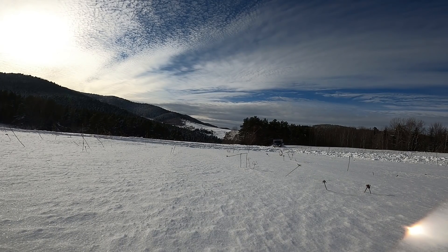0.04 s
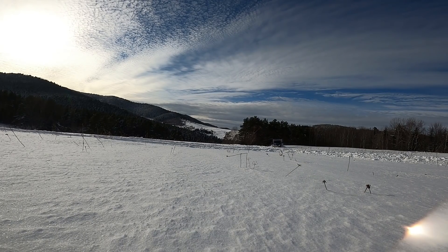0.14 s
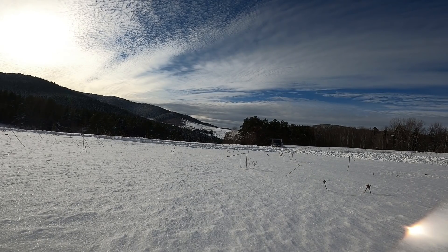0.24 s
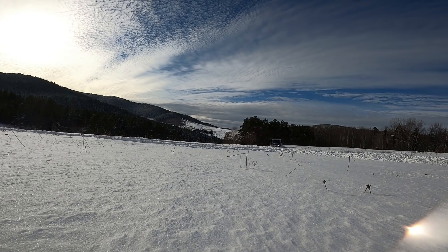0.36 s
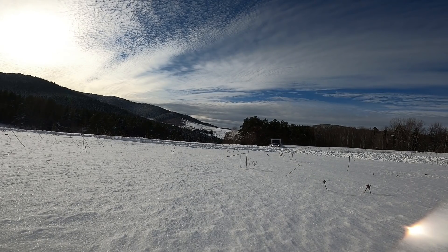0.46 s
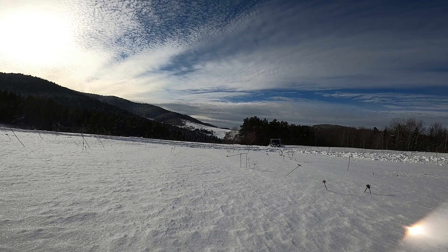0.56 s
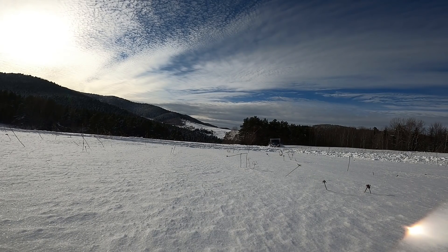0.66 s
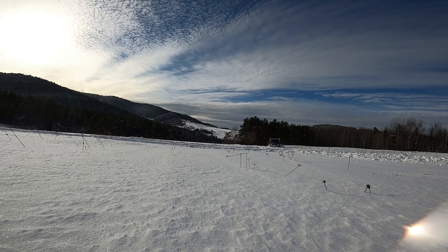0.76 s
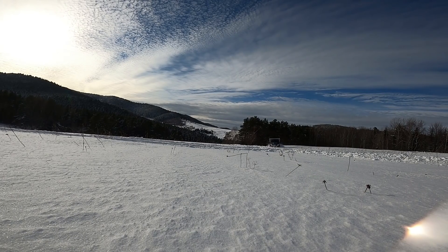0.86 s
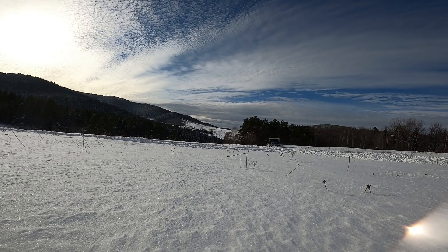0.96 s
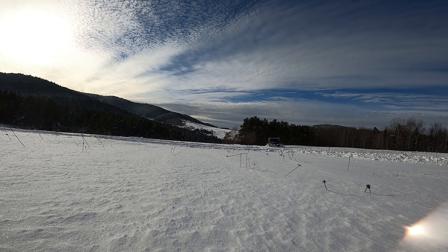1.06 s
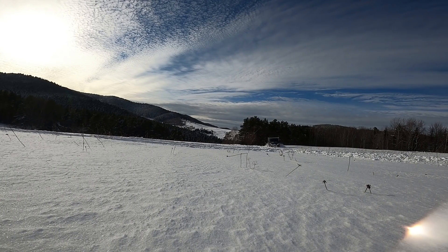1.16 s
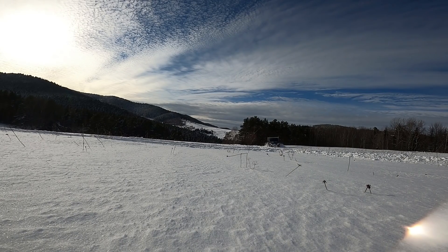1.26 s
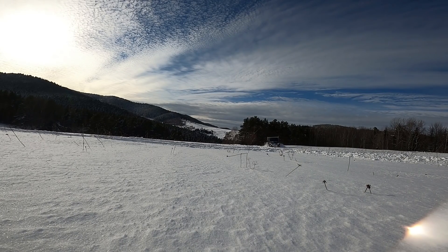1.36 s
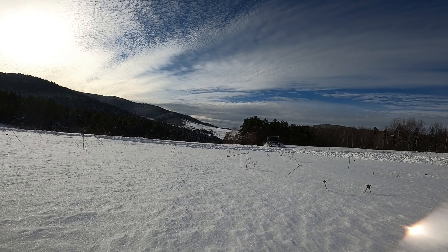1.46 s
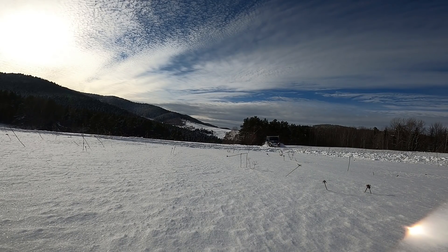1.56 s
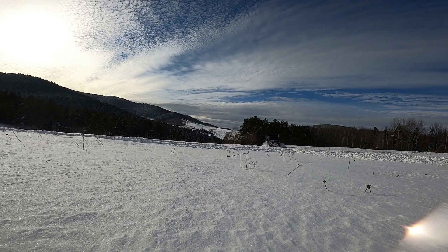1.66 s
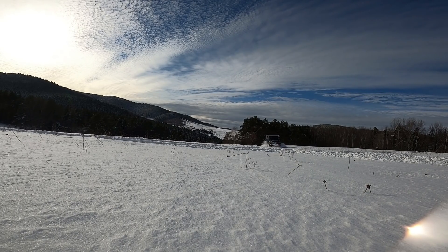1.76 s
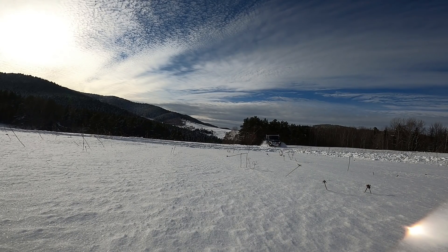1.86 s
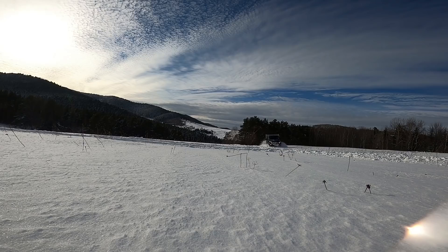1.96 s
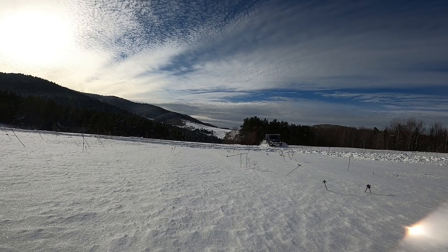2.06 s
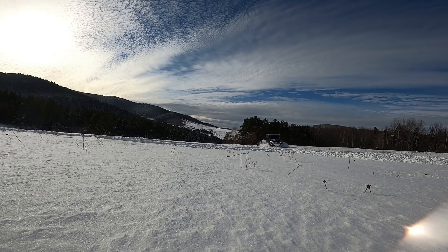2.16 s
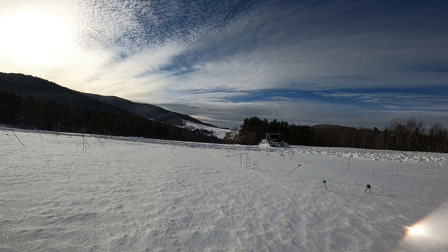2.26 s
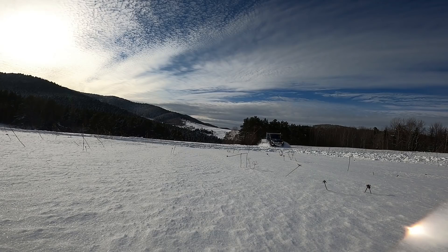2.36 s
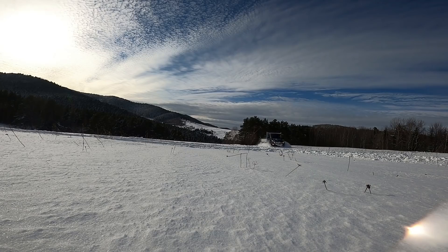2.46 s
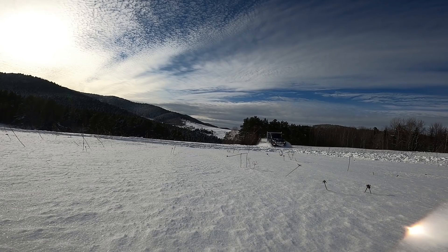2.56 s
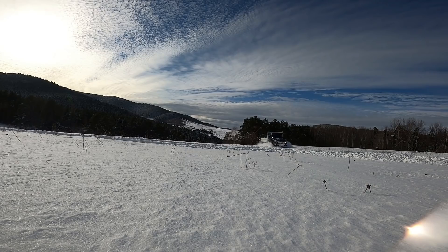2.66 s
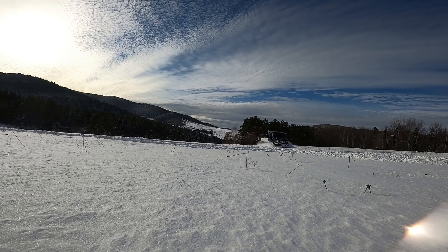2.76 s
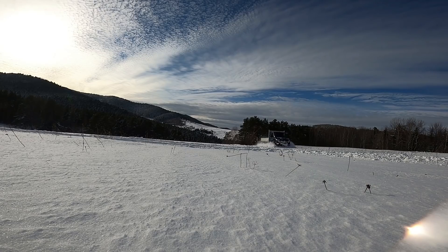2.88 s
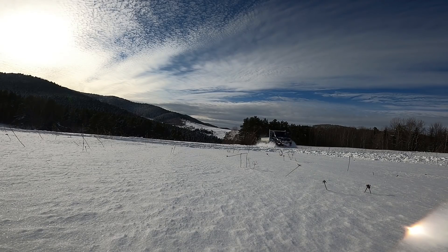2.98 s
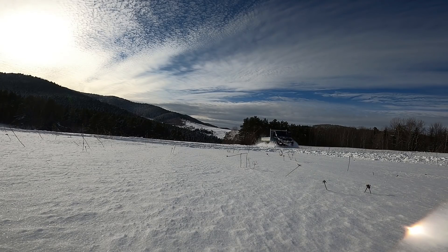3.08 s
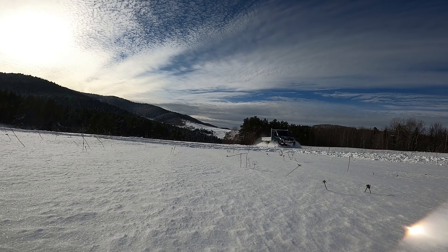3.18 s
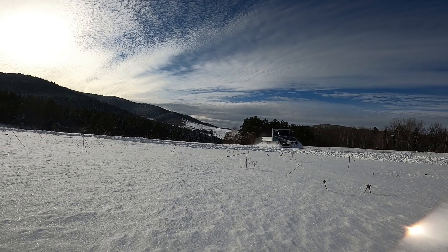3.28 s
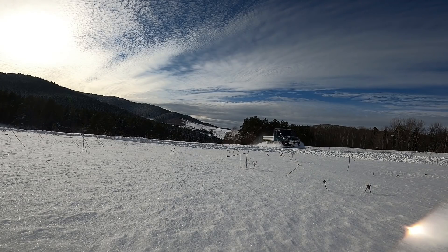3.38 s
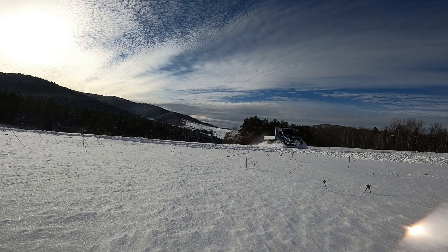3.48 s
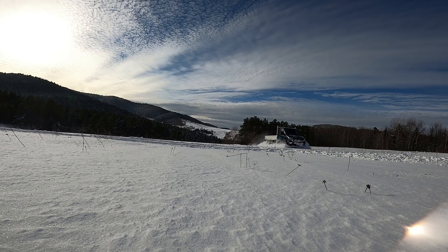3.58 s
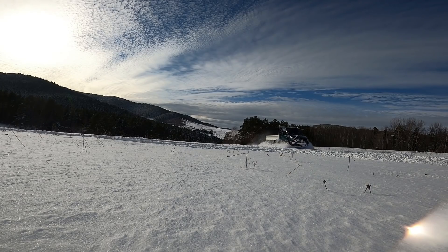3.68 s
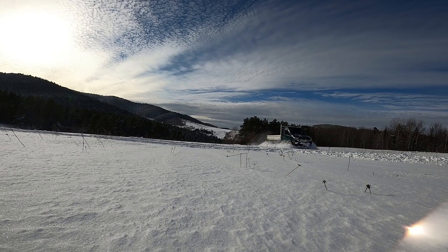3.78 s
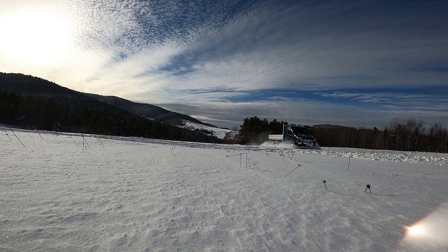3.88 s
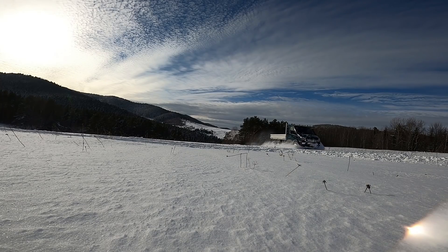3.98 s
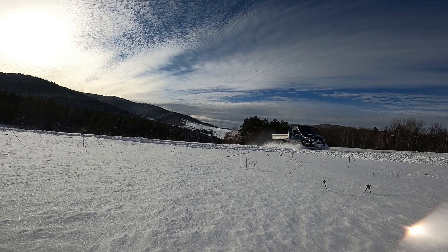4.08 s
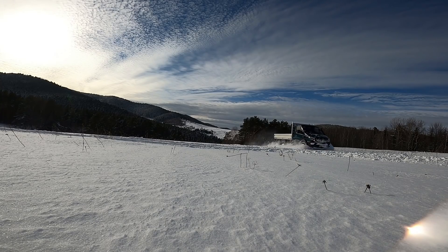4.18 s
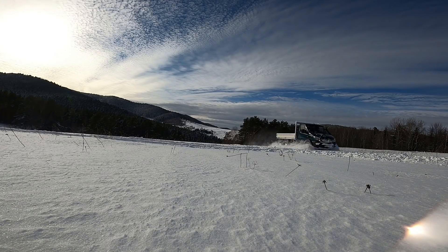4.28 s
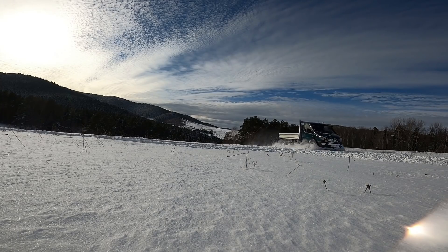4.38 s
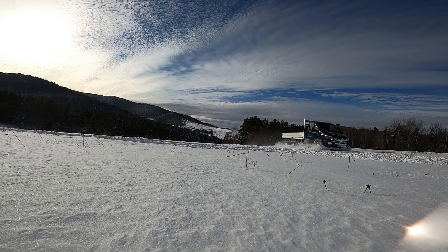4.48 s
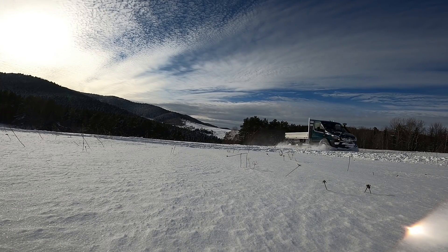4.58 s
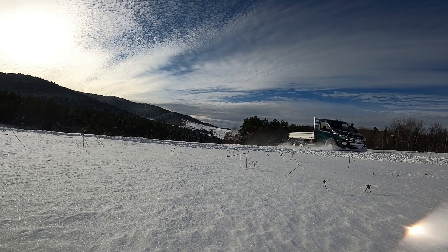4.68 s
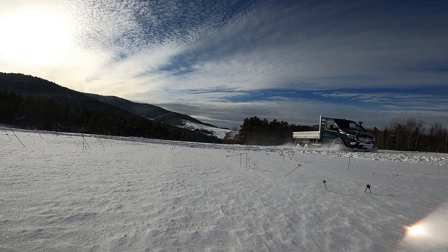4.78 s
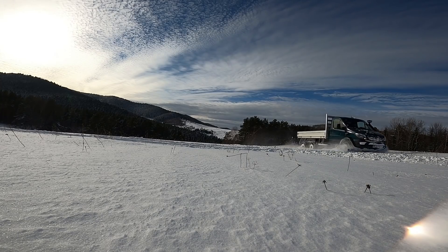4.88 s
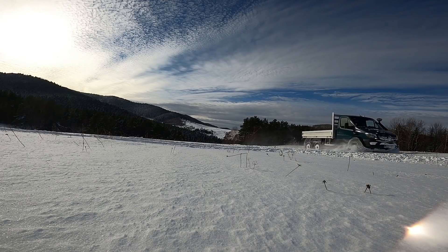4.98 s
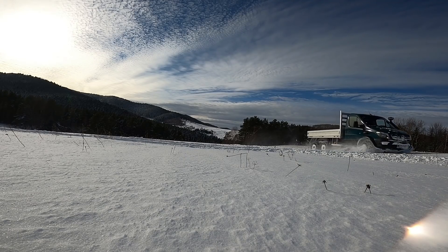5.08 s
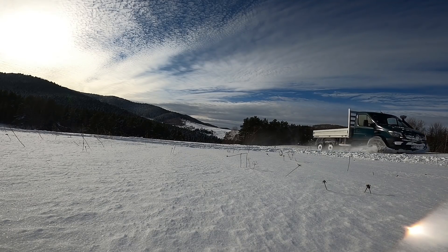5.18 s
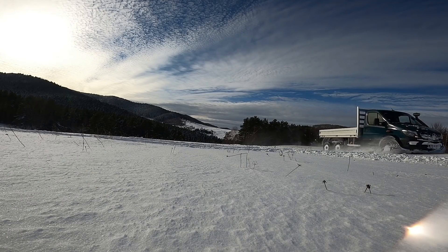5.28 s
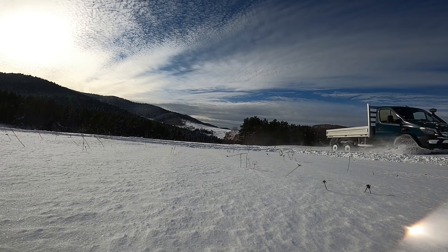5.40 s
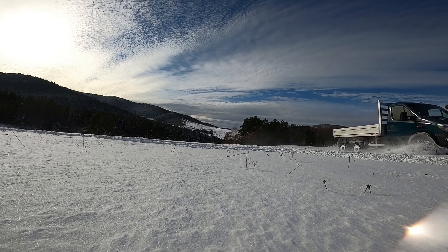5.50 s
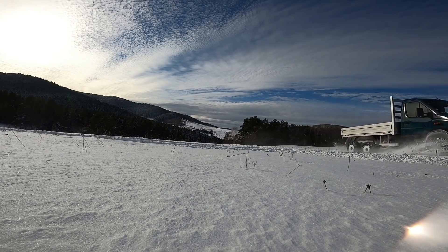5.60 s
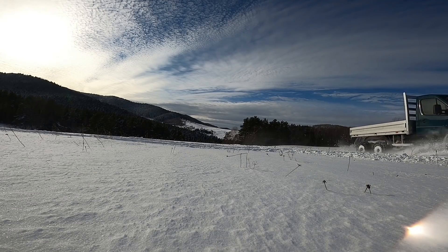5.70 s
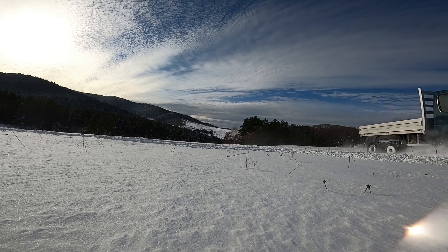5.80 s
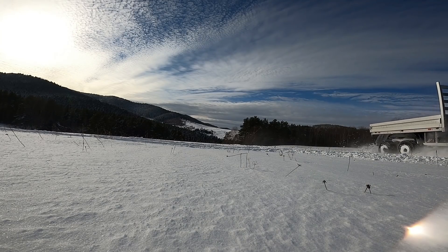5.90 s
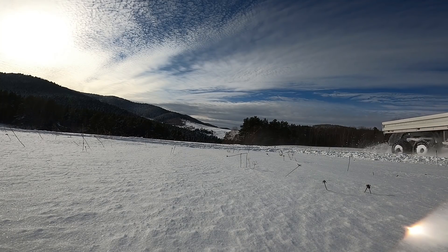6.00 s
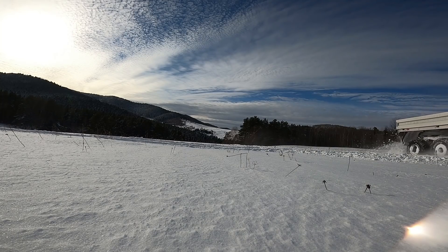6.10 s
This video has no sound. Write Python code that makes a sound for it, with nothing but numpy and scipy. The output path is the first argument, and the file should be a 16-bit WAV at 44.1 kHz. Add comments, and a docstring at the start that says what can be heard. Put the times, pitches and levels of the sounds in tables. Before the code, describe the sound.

Open snowy field, no echo, small stereo camera microphone. From 0 s a distant van hums low and roughly, surging as it digs in, with a hissing rush of air through the grille and two faint ticks at the start. Wind rumbles on the microphone with soft, irregular low thumps throughout. The engine slows in uneven dips, especially around 2.3 and 2.9-3.2 s; just after 3.2 s it emerges less muffled, with a fuller mid-range drone. Tyre churn grows steadily. From about 4 s a thin, unsteady whistle flickers near 1.9 kHz. Around 5 s coarse snow spray becomes prominent, and between 5.2 and 5.8 s loud brittle snaps and short crackles burst out, with a dull thud near 5.3 s. The air rush becomes shadowed as the van draws level on the right around 6.1 s, with another snap and thud, wind strongest, the engine still labouring at the cutoff.

```python
"""A van labours through deep snow across an open field and draws level on the right, its engine sagging under load.
The exhaust hums on crank orders, firings ring the engine bay, and noise rushes through the grille.
Noise and grains make the churned snow; short pulses and bursts make brittle snaps, crackles and dull thuds.
A thin sliding whistle comes and goes. Shaped noise makes wind on the two ports of a small camera,
with short low thumps of a decaying sine."""
import sys
import numpy as np
from scipy import signal
from scipy.fft import rfft, irfft, next_fast_len
from scipy.io import wavfile
from scipy.ndimage import uniform_filter1d, map_coordinates

SR = 44100
rng = np.random.default_rng(int(sys.argv[2]) if len(sys.argv) > 2 else 0)


def store_pcm(level_fs):
    """Save levels as 16-bit WAV."""
    pcm = np.round(np.clip(level_fs, -1, 1) * 32767).astype(np.int16)
    wavfile.write(sys.argv[1], SR, np.atleast_2d(pcm).T)


N = 271082
T = np.arange(N) / SR  # seconds


def amp(db):
    """Decibels to gain."""
    return 10 ** (np.asarray(db) / 20)


def unit(x):
    """Scale to rms 1, all rows together."""
    return x / np.sqrt(np.mean(x ** 2) + 1e-20)


def along(points, hz):
    """(Hz, value) points read on a log axis."""
    f, v = np.transpose(points)
    return np.interp(np.log(hz + 1), np.log(f + 1), v)


def curves(rows):
    """One value per sample for each column after the time."""
    s, *cols = np.transpose(rows)
    return [np.interp(T, s, c) for c in cols]


def wobble(rate_hz):
    """A smooth random curve through rate_hz knots a second."""
    knots = rng.standard_normal(int(N * rate_hz / SR) + 4)
    return map_coordinates(knots, [T * rate_hz])


def gate(start_s, length_s, edge_s):
    """Rise, hold and fall between 0 and 1."""
    inside_s = np.minimum(T - start_s, start_s + length_s - T)
    return np.clip(.5 + inside_s / edge_s, 0, 1)


def turned(at_s, over_s):
    """A smooth step from 0 to 1."""
    return .5 + .5 * np.tanh((T - at_s) / over_s)


def filtered(x, response):
    """x times a complex response of frequency."""
    m = next_fast_len(N + SR // 2)
    return irfft(rfft(x, m) * response(np.fft.rfftfreq(m, 1 / SR)), m)[..., :N]


def coloured(x, spectrum):
    """x shaped by (Hz, dB) points, at rms 1."""
    return unit(filtered(x, lambda hz: amp(along(spectrum, hz))))


def resonate(x, modes):
    """x rung through (Hz, width, dB) resonances with hollows between them, at rms 1."""
    def body(f):
        return sum(amp(db) * 1j * f * w / (c * c - f * f + 1j * f * w) for c, w, db in modes)
    return unit(filtered(x, body))


def steadied(x, over_s):
    """x with its slow swells evened out, at rms 1."""
    size = max(int(over_s * SR), 1)
    power = uniform_filter1d(uniform_filter1d(x ** 2, size=size), size=size)
    return unit(x / np.sqrt(np.abs(power) + 1e-6))


def noise(patchy_db):
    """Two rows of noise (direct, diffuse) sharing patches of gain in time and frequency."""
    z = signal.stft(rng.standard_normal((2, N)), nperseg=1024)[2]
    field = uniform_filter1d(rng.standard_normal(z.shape[1:]), size=6, axis=0)
    field = uniform_filter1d(field, size=12, axis=1)
    patched = signal.istft(z * amp(patchy_db * unit(field)), nperseg=1024)[1]
    return unit(patched[:, :N])


def grains(rate_hz, spread_db):
    """Two rows of tiny random impulses of uneven size, at rms 1."""
    hits = rng.random((2, N)) < rate_hz / SR
    sizes = rng.standard_normal((2, N)) * amp(spread_db * rng.standard_normal((2, N)))
    return unit(hits * sizes)


# the van's straight path
SPEED_M_PER_S, CLOSEST_M, LEVEL_AT_S = 7.09, 8.28, 6.108


def distance():
    """Metres from the van to the camera."""
    return np.hypot(CLOSEST_M, SPEED_M_PER_S * (T - LEVEL_AT_S))


def carried(close_db, doubling_db, per_m_db):
    """Gain over distance: spreading loss per doubling, and a little soaked up by the snow per metre."""
    r = distance()
    return amp(close_db - doubling_db * np.log2(r / CLOSEST_M) - per_m_db * (r - CLOSEST_M))


def screened(loss_db):
    """The engine is muffled until the van comes clear of a rise in the snow."""
    return amp(loss_db * (1 - turned(at_s=3.24, over_s=0.038)))


# Engine speed before waver. Each row: time in seconds, crankshaft speed in turns per second.
CRANK_TURNS_PER_S = [(0.0, 70.0), (1.2, 68.7), (2.13, 68.2), (2.33, 65.2), (2.45, 66.3), (2.6, 65.2),
                     (2.75, 64.6), (2.85, 61.5), (3.0, 64.0), (3.12, 64.4), (3.21, 58.8), (3.6, 57.6),
                     (3.97, 57.5), (4.15, 54.9), (4.33, 57.5), (4.5, 52.7), (4.68, 52.7), (4.84, 55.0),
                     (5.02, 52.0), (5.15, 52.0), (5.28, 55.0), (5.53, 55.0), (5.59, 53.2), (5.64, 55.3),
                     (5.75, 55.9), (5.81, 57.4), (5.89, 57.2), (5.98, 54.8), (6.15, 57.8)]


def crank_turns(waver=0.0043):
    """Turns of the crankshaft so far; the speed wavers as the wheels grip and slip."""
    return np.cumsum(curves(CRANK_TURNS_PER_S)[0] * (1 + waver * wobble(22))) / SR


def firing_gate(turns, depth):
    """Four cylinders give two surges of flow a turn."""
    return unit(1 + np.clip(depth, 0, 1) * np.cos(2 * np.pi * 2 * turns))


# Exhaust note. Each row: order in multiples of crank speed, relative level in dB.
NOTE_ORDER_DB = [(3, -12), (4, 14.5), (4.5, -1), (5, -16), (5.5, -13)]
# Spectrum of gas from the pipe. Each row: frequency in Hz, relative density in dB.
PIPE_HZ_DB = [(25, -17), (55, 3), (85, 5), (118, -3.5), (160, -9), (190, -26.5), (300, -21.5), (600, -82),
              (2000, -120)]
# Swells as the engine digs in. Each row: start in seconds, length in seconds, boost in dB.
SURGES_S_DB = [(0.0, 0.089, 14.5), (0.14, 0.3, 18), (0.91, 0.27, 5), (1.43, 0.091, 8.5), (1.74, 0.16, 8.5),
               (2.078, 0.3, 7), (2.43, 0.34, 7.5), (2.794, 0.33, 5), (3.576, .44, 1.5), (4.046, 0.22, 8),
               (4.392, 0.57, 5), (5.292, 0.36, 2)]


def exhaust(turns):
    """Crank orders, roughened by uneven combustion and wrapped in rasp, over a throb of gas from the pipe."""
    rough_rad, flutter_db, shimmer_db = .27, 1.5, 1.7
    far_rasp_db, near_rasp_db = -5, -16.5

    def order(k):
        phase = 2 * np.pi * (k * turns + rng.random()) + rough_rad * wobble(60)
        return np.sin(phase) * amp(flutter_db * wobble(30))

    note = unit(sum(amp(db) * order(k) for k, db in NOTE_ORDER_DB))
    rasp_hz_db = [(110, -36), (150, -8), (195, -14.5), (245, -3.5), (272, 1.0), (305, -10), (420, -29), (800, -92)]
    rasp = coloured(noise(patchy_db=2.0), rasp_hz_db)
    gas = coloured(noise(patchy_db=1.0) * firing_gate(turns, depth=0.47), PIPE_HZ_DB)
    # while the van is far off, moving air shakes the hum and the rasp stands out more
    far = np.interp(T, [3.6, 4.1], [1, 0])
    shaken = note * amp(shimmer_db * far * wobble(29.99))
    voice = shaken + amp(far * far_rasp_db + (1 - far) * near_rasp_db) * rasp
    surge_db = sum(db * gate(s, length, edge_s=0.015) for s, length, db in SURGES_S_DB)
    hum = carried(close_db=-37.0, doubling_db=10.5, per_m_db=0.43) * amp(surge_db) * voice
    # a faint extra rasp as the engine first bogs down
    bogging = amp(-59) * gate(3.05, 0.86, edge_s=.08) * rasp
    throb = carried(close_db=-31, doubling_db=6, per_m_db=0.6) * gas
    firing_tone = unit(order(2) * amp(3.6 * wobble(14)))
    firing = carried(close_db=-41, doubling_db=0.5, per_m_db=0.5) * screened(loss_db=-6.5) * firing_tone
    return hum + bogging + throb + firing


# Engine bay resonances. Each row: centre in Hz, width in Hz, relative level in dB.
BAY_HZ_HZ_DB = [(275, 25, -8), (459, 16, -12), (574, 43, 7), (634, 37, -3.5), (705, 18, -3.5),
                (846.4, 17.5, 1), (971, 18, -5.5)]
# Drone swells and slackens with load. Each row: start in seconds, length in seconds, change in dB.
LOADS_S_DB = [(3.09, .08, -1), (3.19, 0.089, 3.5), (3.387, 0.091, 1.5), (4.633, 0.15, 0.5),
              (4.86, 0.272, -2), (5.252, 0.11, 1.5), (5.771, 0.33, 1.5)]


def engine_bay(turns, knock=0.42, uneven=0.41):
    """Each firing knocks the resonances of the engine bay, joined by noise, into a continuous drone."""
    at = np.flatnonzero(np.diff(np.floor(2 * turns)))
    cylinders = np.resize(rng.standard_normal(size=4), len(at))
    knocks = np.zeros(N)
    knocks[at] = 1 + uneven * (cylinders + rng.standard_normal(len(at)))
    drive = knock * unit(knocks) + noise(patchy_db=1.5) * firing_gate(turns, depth=0.11)
    drone = steadied(resonate(drive, BAY_HZ_HZ_DB), over_s=.09)
    load_db = sum(db * gate(s, length, edge_s=0.04) for s, length, db in LOADS_S_DB)
    gain = carried(close_db=-40.5, doubling_db=4.0, per_m_db=0.66) * screened(loss_db=-2.5)
    return gain * amp(load_db) * drone


# Air rush spectrum. Each row: frequency in Hz, relative density in dB.
RUSH_HZ_DB = [(600, -89), (1100, -11), (1800, -4), (2300, -5.5), (2800, -0.5), (3400, 0.5), (4000, -1),
              (4800, 2), (6000, -1.5), (6900, -5), (7750, -9.5), (8150, -18.5), (12300, -30), (15000, -44)]
# Narrow resonances of air through grille and fan. Each row: centre in Hz, width in Hz,
# level in dB relative to the rush, strongest moment in seconds, spread in seconds, slide in Hz per second.
GRILLE_RINGS = [(1312, 100, -14.5, 2.75, 0.65, -100), (2025, 110, -17, 1.6, 0.49, -31.5),
                (1716, 130, -13.5, 3.75, 0.43, -39.5), (2712, 120, -14, 0.3, 2.4, 1),
                (3230, 120, -15.5, 0.47, 1.6, -2), (3630, 150, -17, .5, 1.8, 0),
                (4650, 300, -8, 0.44, 1.45, 21), (4900, 170, -16, 2.4, 0.46, -1),
                (3260, 280, -13.5, 3.6, 0.62, -40.5), (3750, 150, -12.5, 4.4, 0.86, -57),
                (4710, 160, -10.5, 4.4, 0.92, -100), (6090, 430, -15.5, 0.27, 2, 2)]


def fan(turns):
    """Air rushes through the grille; its narrow noise resonances swell, slide and fade."""
    air = coloured(noise(patchy_db=1.58) * firing_gate(turns, depth=0.024), RUSH_HZ_DB)
    rings = 0
    for hz, width_hz, db, at_s, spread_s, slide_hz_per_s in GRILLE_RINGS:
        lowpass = lambda f: 1 / (1 + (2 * f / width_hz) ** 4)
        band = unit(filtered(rng.standard_normal((2, N)), lowpass))
        phase = 2 * np.pi * np.cumsum(hz + slide_hz_per_s * (T - at_s)) / SR
        swell = amp(db) * np.exp(-((T - at_s) / spread_s) ** 2 / 2)
        rings = rings + swell * (band[0] * np.cos(phase) + band[1] * np.sin(phase))
    # in passing, the cab shadows the whole rush
    shadow = amp(-11 * turned(at_s=5.65, over_s=0.86))
    surge = amp(0.43 * wobble(14))
    direct_only = np.array([[1], [0]])
    gain = carried(close_db=-34.5, doubling_db=5, per_m_db=0.3) * shadow * surge
    return gain * (air + rings * direct_only)


# Tyre churn spectrum. Each row: frequency in Hz, relative density in dB.
CHURN_HZ_DB = [(100, -23), (300, -7), (420, -15), (620, 0.5), (715, -2), (790, -8), (940, -11),
               (1060, -0.5), (1280, 5), (1520, 2.5), (1800, 4.5), (2250, -2.5), (3300, -13), (5000, -26),
               (9000, -50), (15000, -66)]
# Thrown snow spectrum. Each row: frequency in Hz, relative density in dB.
SPRAY_HZ_DB = [(150, 14), (400, -0.5), (690, 6.5), (780, -2), (900, 2), (1150, 3), (1500, 1), (2200, 2.5),
               (3500, -3), (4300, -12), (5000, -11), (7500, -12), (8700, -39), (12500, -44), (14200, -55),
               (15500, -65)]


def wheels(grainy=0.69, surge_db=0.5):
    """Tyres churn the snow; once the van's flank shows, the thrown crumbs stand out."""
    def crumbs():
        return grainy * grains(rate_hz=2500, spread_db=2.5)

    churn = coloured(noise(patchy_db=0.3) + crumbs(), CHURN_HZ_DB)
    churn = carried(close_db=-43.0, doubling_db=2.0, per_m_db=0.6) * churn
    spray = coloured(noise(patchy_db=1) + crumbs(), SPRAY_HZ_DB)
    spray = carried(close_db=-34.0, doubling_db=17.0, per_m_db=3.0) * spray
    hidden_db = -9 * (1 - turned(at_s=4.96, over_s=0.074))
    # far off, the lie of the snow screens the tyres
    screened_db = -3.5 * (1 - turned(at_s=2.03, over_s=0.14))
    return (amp(screened_db) * churn + amp(hidden_db) * spray) * amp(surge_db * wobble(15))


# Freshening wind, before trims. Each row: time in seconds, buffet level in dB.
WIND_S_DB = [(0, -42), (.9, -45.5), (1.35, -44), (1.6, -41.5), (1.95, -40), (3.3, -39), (3.9, -35.5),
             (4.6, -37.5), (5.2, -33.5), (6.15, -30)]
# Wind pressure spectrum. Each row: frequency in Hz, relative density in dB.
BUFFET_HZ_DB = [(8, -15.5), (22, -1.5), (37, 1.5), (48, -1.5), (62, -4.5), (85, -10.5), (120, -25.5),
                (200, -25.5), (400, -39.5), (1000, -77), (4000, -120)]


def wind(trim_db=-0.1, lump_db=0.05, eddy_db=-23, eddy_lump_db=4, left_db=1.65):
    """Wind presses on both ports, with low thumps; small eddies flick each port alone."""
    press = steadied(coloured(rng.standard_normal(N), BUFFET_HZ_DB), over_s=.1)
    press = unit(press * amp(lump_db * wobble(23)))
    eddy_hz_db = [(15, -12), (50, -4.0), (150, -6.5), (400, -12.0), (1500, -31), (4000, -120)]
    eddies = coloured(rng.standard_normal((2, N)), eddy_hz_db)
    eddies = unit(eddies * amp(eddy_lump_db * np.array([wobble(26), wobble(23.2)])))
    buffet = amp(curves(WIND_S_DB)[0] + trim_db) * (press + amp(eddy_db) * eddies)
    return (buffet + thumps()) * amp([[left_db], [-left_db]])


# Brittle snaps and crackles: two faint early ticks, then loud cracks close by. Each row: time in seconds,
# crack level in dB, knock as a share of the crack, crackle level in dB, crackle length in seconds.
SNAPS_S_DB = [(0.04, -40, .3, -50.5, 0.0035), (.135, -46, .3, -56.5, 0.015),
              (5.1823, -10.5, 0.34, -30, 0.01), (5.274, -13, 0.23, -36, 0.011),
              (5.284, -24, .4, -33.5, 0.014), (5.3178, -10.5, 0.6, -29.5, 0.0057),
              (5.4396, -14, 0.35, -31.5, 0.0072), (5.6384, -8.5, .28, -29.5, 0.0049),
              (5.759, -16, 0.46, -38, 0.0048), (6.106, -22, .3, -32, 0.012)]


def snaps(crack_hz=4000, crack_life_s=0.00031, knock_hz=1900, knock_life_s=.00024):
    """Each brittle snap is a crack of a few cycles over a duller knock."""
    out = np.zeros(N)
    for s, db, knock_share, _, _ in SNAPS_S_DB:
        t = T - s
        crack = np.exp(-(t / crack_life_s) ** 2) * np.cos(2 * np.pi * crack_hz * t)
        knock = np.exp(-(t / knock_life_s) ** 2) * np.sin(2 * np.pi * knock_hz * t)
        out += amp(db) * (crack - knock_share * knock)
    return out


def crackles(lag_share=0.53):
    """Short bursts of coloured grains that peak just after each snap."""
    bursts = 0
    for s, _, _, db, length_s in SNAPS_S_DB:
        bursts = bursts + amp(db) * np.exp(-(2 * ((T - s) / length_s - lag_share)) ** 2)
    crackle_hz_db = [(200, -16), (800, -9), (1400, -1), (2500, 0), (4300, 0),
                     (5600, -13), (7000, -16), (9000, -37), (15000, -54)]
    return bursts * coloured(grains(rate_hz=6000, spread_db=2), crackle_hz_db)


# Short low thumps on the ports. Each row: time in seconds, level in dB before envelope and port balance.
THUMPS_S_DB = [(0.061, -33), (.383, -34.5), (0.573, -33), (0.651, -33.5), (.858, -37), (.972, -34.5),
               (1.187, -30), (1.247, -27), (1.765, -27), (1.903, -30), (2.035, -29.5), (2.43, -33),
               (2.809, -30.5), (3.052, -28.5), (3.411, -27.5), (3.529, -30), (3.703, -30.5), (4.036, -28),
               (4.3, -29.5), (4.866, -27.5), (4.916, -26), (5.186, -23), (5.243, -23), (5.58, -27),
               (5.713, -25), (5.805, -23.5), (5.902, -24), (6.1, -22)]


def thumps(hz=52, life_s=0.013):
    """Each thump lasts about one slow cycle."""
    out = 0
    for s, db in THUMPS_S_DB:
        t = T - s
        out = out + amp(db) * np.exp(-(t / life_s) ** 2) * np.sin(2 * np.pi * hz * t)
    return out


# Whistle swells. Each row: start in seconds, length in seconds, level in dB before the crest gain,
# start pitch in Hz, end pitch in Hz.
WHISTLES_S_DB_HZ = [(4.039, 0.07, -48, 1900, 1888), (4.163, 0.069, -50, 1883, 1896),
                    (4.368, .11, -58, 1869, 1916), (4.49, 0.77, -48, 1893, 1901),
                    (4.52, 0.11, -61, 1882, 1912), (4.66, 0.072, -49, 1903, 1882),
                    (4.812, 0.057, -57, 1862, 1874), (4.882, 0.21, -46.5, 1895, 1900),
                    (5.113, 0.08, -42.5, 1888, 1902), (5.419, 0.033, -40, 1896, 1894),
                    (5.5, 0.12, -43, 1861, 1916), (5.66, 0.07, -45, 1895, 1905),
                    (5.875, 0.05, -43, 1850, 1860), (5.951, 0.066, -40.5, 1860, 1926),
                    (6.02, 0.105, -42, 1880, 1850)]


def whistle(flicker_db=1, crest=1.25):
    """A thin unsteady engine whistle in a narrow band of air; it slides in each swell and lingers faintly."""
    bursts, points = 0, []
    for s, length_s, db, first_hz, last_hz in WHISTLES_S_DB_HZ:
        arch = np.sqrt(np.clip(1 - (2 * (T - s) / length_s - 1) ** 2, 0, 1))
        bursts = bursts + amp(db) * arch
        points += [(s, first_hz), (s + length_s, last_hz)]
    lingering = carried(close_db=-55.0, doubling_db=-1.0, per_m_db=0.5) * turned(at_s=3.1, over_s=0.41)
    hz, = curves(sorted(points))
    drift, rough, breathy = .002, .006, .29  # shares of pitch, pitch, level
    phase = 2 * np.pi * np.cumsum(hz * (1 + drift * wobble(25) + rough * wobble(170))) / SR
    tone = (1 + breathy * wobble(140)) * np.sin(phase) + breathy * wobble(140) * np.cos(phase)
    return (crest * bursts + lingering) * unit(tone * amp(flicker_db * wobble(28)))


# A wheel drops through the crust. Each row: time of the peak in seconds, length in seconds, level in dB.
THUDS_S_DB = [(5.294, 0.072, -40.5), (6.118, 0.034, -38.5)]


def thuds():
    """Packed snow gives way under a wheel in a dull burst of noise."""
    sinking = sum(amp(db) * np.exp(-(2 * (T - s) / length) ** 2) for s, length, db in THUDS_S_DB)
    thud_hz_db = [(120, -20), (200, -2), (330, 2), (420, -8), (600, -4), (1200, -10), (2500, -30), (6000, -70)]
    return sinking * coloured(noise(patchy_db=-1), thud_hz_db)


# Port phase for sound from ahead. Each row: frequency in Hz, left lead in radians.
PORT_LEAD_HZ_RAD = [(30, 0), (430, -.5), (2000, -.7), (4050, -1.3), (5200, -2.25), (5700, -2.75),
                    (6100, -2.95), (6800, -3.25), (8400, -1.9), (10500, -2.4), (13000, -3.1)]
# Port balance for sound from ahead. Each row: frequency in Hz, left over right in dB.
PORT_TILT_HZ_DB = [(100, 1.3), (210, .2), (380, -.7), (600, -2.1), (1000, -3.7), (1900, -4.3), (2500, -2.1),
                   (4000, -.8), (5700, 0), (6600, -1.5), (8100, -5.3), (15000, -3.6)]
# Diffuseness. Each row: frequency in Hz, diffuseness from 0 (none) to 1 (equal direct and diffuse power).
DIFFUSE_HZ_SHARE = [(100, .015), (1500, .04), (2400, .08), (4500, .05), (5400, .012), (5900, .012),
                    (6500, .07), (8200, .33), (15000, .45)]


def ports(van):
    """Sound bends round the camera to two ports; the left one lags more as the van draws level."""
    def diffuse_power(hz):
        return np.clip(along(DIFFUSE_HZ_SHARE, hz), 0, 1) / 2

    def left_half(hz):
        return amp(along(PORT_TILT_HZ_DB, hz) / 2) * np.exp(.5j * along(PORT_LEAD_HZ_RAD, hz))

    direct = filtered(van[0], lambda hz: np.sqrt(1 - diffuse_power(hz)))
    diffuse = filtered(van[1], lambda hz: np.sqrt(diffuse_power(hz)))
    pair = np.array([direct + diffuse, direct - diffuse])
    left, right = filtered(pair, lambda hz: np.array([left_half(hz), 1 / left_half(hz)]))
    side_lag_s, ahead_rad = 2.6e-5, .22
    bearing_rad = np.arctan2(CLOSEST_M, SPEED_M_PER_S * (LEVEL_AT_S - T))
    lag_samples = side_lag_s * np.maximum(np.sin(bearing_rad) - np.sin(ahead_rad), 0) * SR
    return np.array([map_coordinates(left, [np.arange(N) - lag_samples], order=5), right])


def scene():
    """The van on open snow, with no echo, and the wind and thumps."""
    turns = crank_turns()
    engine = exhaust(turns) + engine_bay(turns) + fan(turns) + whistle()
    ground = wheels() + snaps() + crackles() + thuds()
    return ports(engine + ground) + wind()


def record(dry, top_hz=15700):
    """The camera keeps nothing above its band limit."""
    return filtered(dry, lambda hz: hz < top_hz)


dry = scene()
out = record(dry)
store_pcm(out)
```